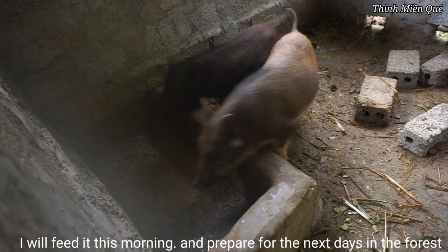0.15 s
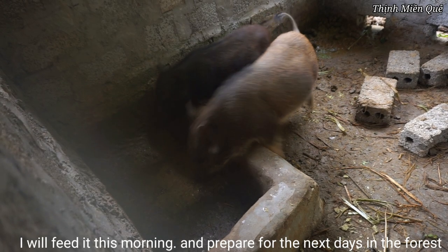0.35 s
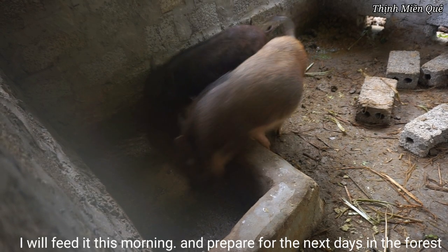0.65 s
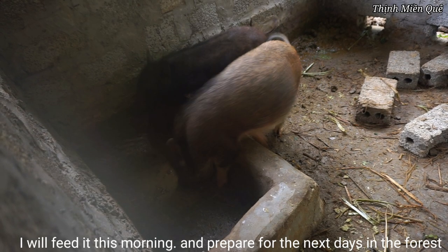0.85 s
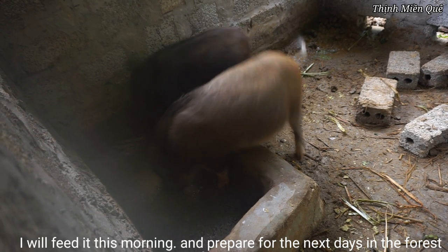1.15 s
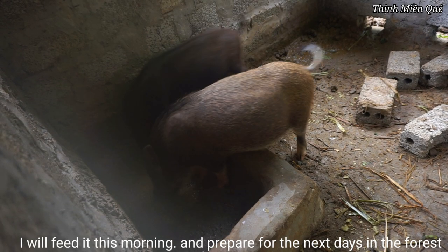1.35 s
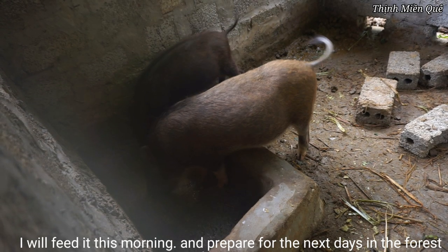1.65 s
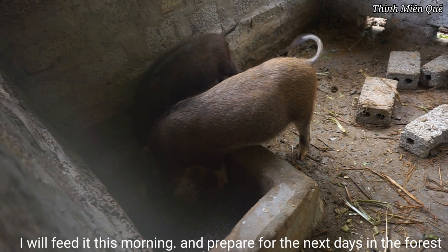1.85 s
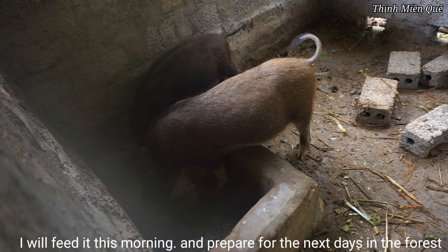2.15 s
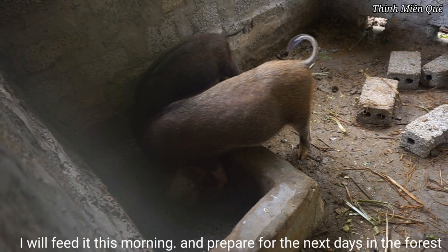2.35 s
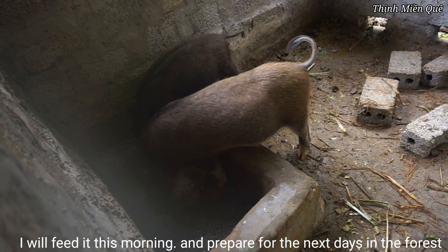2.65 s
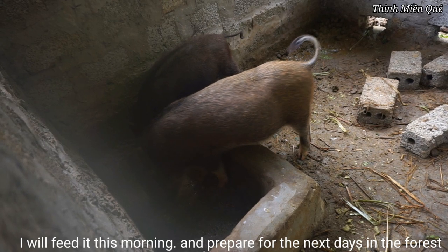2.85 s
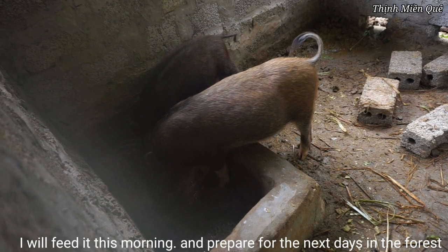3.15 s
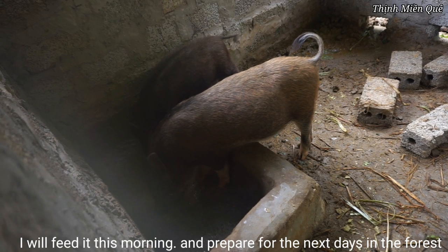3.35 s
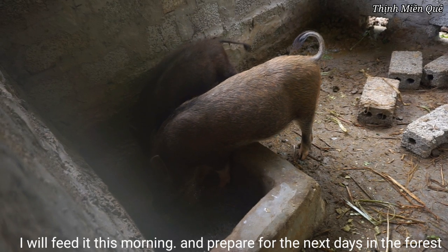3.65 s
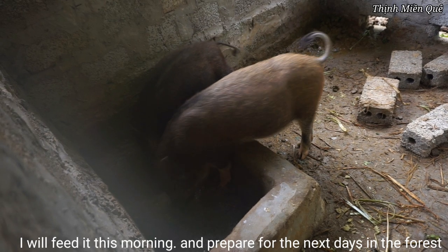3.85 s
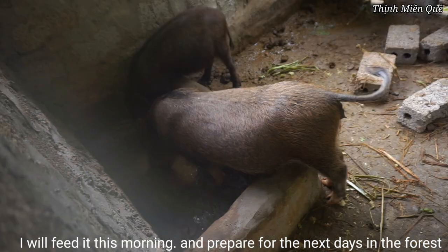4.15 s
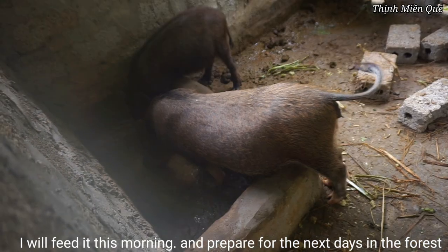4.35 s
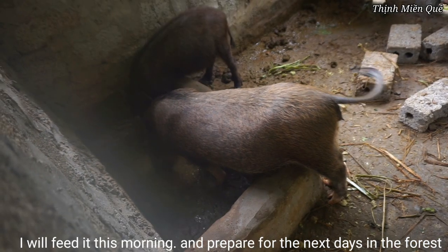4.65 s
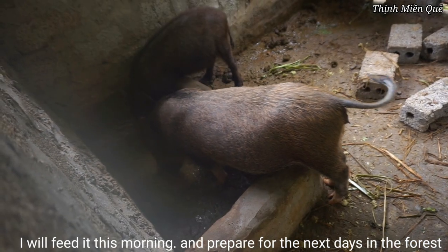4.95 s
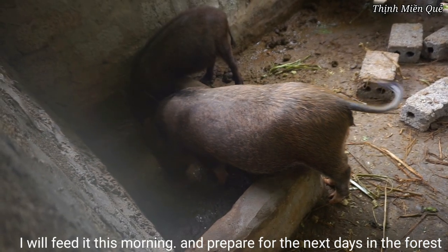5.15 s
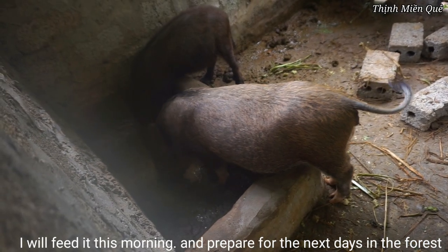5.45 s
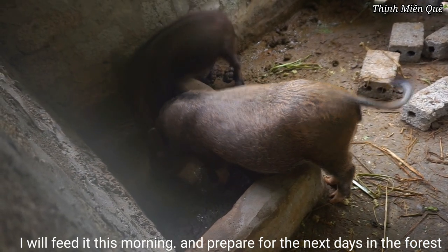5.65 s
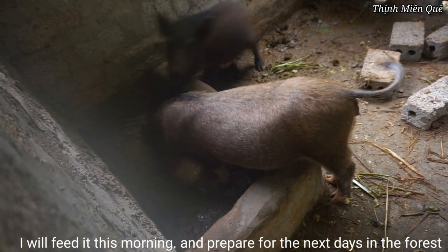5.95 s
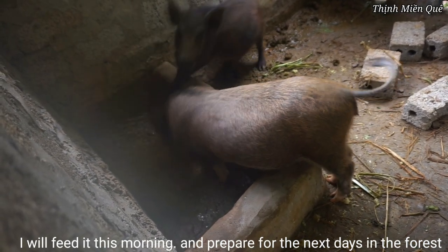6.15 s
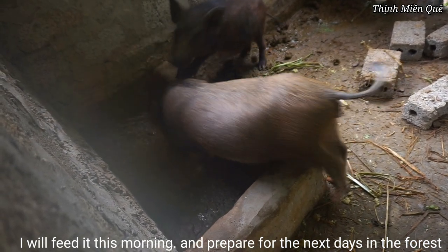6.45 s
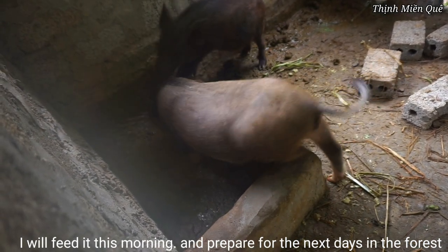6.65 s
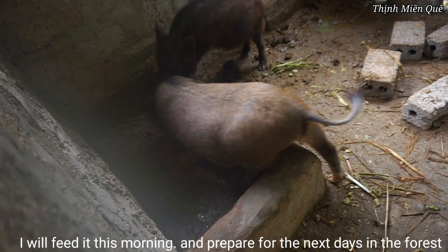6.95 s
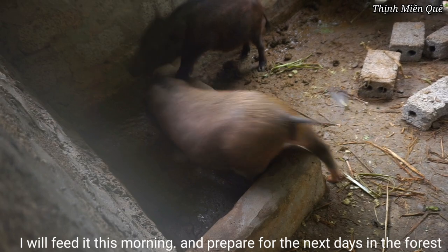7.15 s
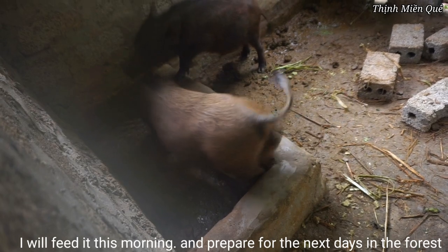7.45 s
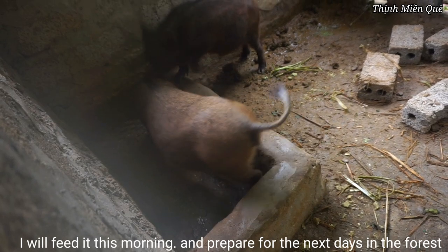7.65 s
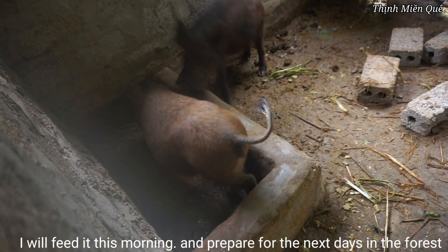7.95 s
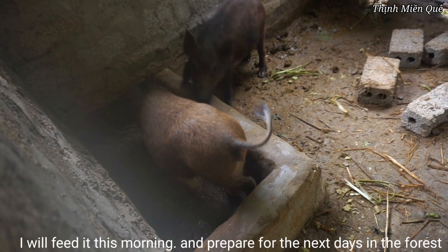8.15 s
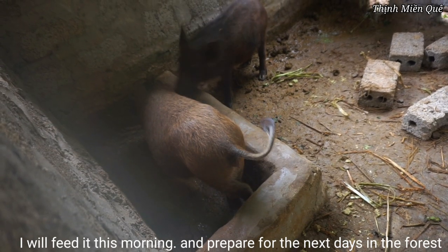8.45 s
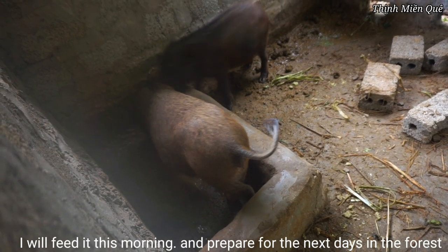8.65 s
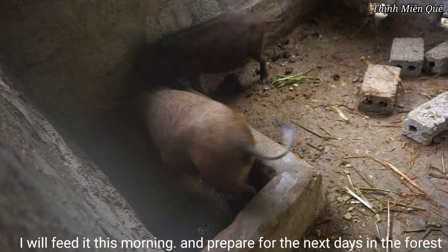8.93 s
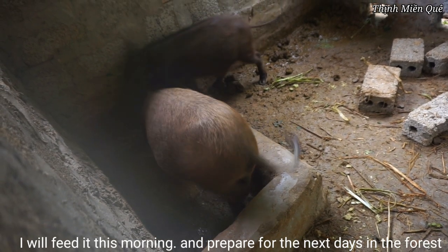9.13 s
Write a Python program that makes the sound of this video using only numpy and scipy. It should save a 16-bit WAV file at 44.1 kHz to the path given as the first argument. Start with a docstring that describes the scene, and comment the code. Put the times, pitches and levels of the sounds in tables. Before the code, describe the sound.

Close stereo sound of two pigs eating wet feed from a concrete trough, brighter and louder on the left, with very short wall echoes over faint open-air hiss and rumble. A soft slurp swells around 0.3 s; from 0.8 s lips smack and tongues plop irregularly, over a fine crackle of bubbles. Sharper wet snaps cluster from 1.4 to 3.5 s, with a drawn-out slurp near 3.4. At 4.2 s everything drops to silence for under a tenth of a second, then quickly returns. A dull trough bump lands at 5.3 s, the sharpest smack at 5.8, then slurps. A far low motor hum swells until 7 s and eases slightly. Hollow plops thicken from 6.4 to 8.2 s; short rising squeaks come at 6.9 and 7.3. Another soft bump falls at 8.1, a brief muffled grunt with tiny squeaks at 8.9, and a last smack, plop and faint thud at 9.1 s.

```python
"""Two pigs slurp wet feed from a concrete trough in a walled pen, two microphone ports close above them.
Open-air noise lies under it all; the first slurp swells at 0.3 s and the lips smack and the tongue plops
from 0.8 s, as bursts of snaps ringing air pockets, over a crackle of tiny bubbles and brief wall echoes.
At 4.2 s the sound drops out for a moment; then a far motor, narrow bands of noise, swells until 7 s.
Dull bumps on the trough come from 5.3 s, short squeaks from 6.9 s and one soft noisy grunt at 8.9 s."""
import sys
import numpy as np
from scipy import signal
from scipy.fft import rfft, irfft
from scipy.io import wavfile
from scipy.ndimage import uniform_filter1d

SR = 44100
rng = np.random.default_rng(int(sys.argv[2]) if len(sys.argv) > 2 else 0)


def unload_wav(signal):
    """Save mono or channel-first audio to the path in sys.argv[1] as 16-bit WAV at rate SR, clipped to [-1, 1]."""
    wavfile.write(
        sys.argv[1],
        SR,
        np.round(np.clip(np.atleast_2d(signal).T, -1, 1) * 32767).astype(np.int16),
    )


N = 409688

# Levels of the pigs' sounds are those at the trough, ahead of the wall echoes and the port differences.
# open-air noise: f/Hz, relative level per Hz/dB
YARD_COLOUR = [(25, -19), (120, 1.5), (420, -3.5), (550, 3.5), (1200, -7), (2400, -8.5), (3100, -14),
               (11000, -17)]
YARD_DB = -54  # overall level
# likeness of the open air at the two ports: f/Hz, left-right correlation/1
YARD_LIKENESS = [(60, 1), (220, 0.25), (840, -0.72), (3100, -0.27), (11000, 0.18)]
# tones of the far motor: f/Hz, width of each filter pass/Hz, level before the swell/dB
HUM_TONES = [(58, 48, -70), (94, 27, -73), (146, 22, -71), (205, 16, -70.5)]
# swell of the far motor: t/s, gain/dB
HUM_SWELL_DB = [(0, -28.5), (4.4, -12), (6.6, 0), (7, 10), (9.29, 5.5)]
# dying away of the pen's echoes: f/Hz, time to fall 60 dB/s
WALL_T60 = [(250, 0.26), (660, 0.1), (1600, 0.12), (2350, 0.12), (3300, 0.1), (9000, 0.12)]
# level difference of the ports: f/Hz, left over right/dB
PORT_LEVEL = [(170, 1), (500, 4.5), (1420, 3.5), (4080, 6.5), (9000, 6)]
# phase difference of the ports: f/Hz, lead of the left/rad (negative lags)
PORT_PHASE = [(100, -0.72), (520, -0.48), (1380, -1.2), (2500, -0.94), (4100, -1.4), (11000, -2.37)]
# a snout or flank bumps the trough: t/s, peak level/dB, f/Hz
TROUGH_BUMPS = [(5.259, -43, 147), (8.121, -45, 163.4), (9.083, -50, 156)]
# soft grunts through the snout: t/s, length/s, peak level/dB, mean pulse rate/Hz,
# f near the middle of the falling glide/Hz
SNOUT_GRUNTS = [(8.888, .065, -40, 140, 430)]
# air sucked through wet lips: t/s, length/s, start f/Hz, end f/Hz, peak level of the pure tone/dB
LIP_SQUEAKS = [(6.909, 0.0555, 2040, 2590, -37.5), (7.341, 0.043, 900, 1350, -45.5),
               (8.865, 0.013, 1910, 1970, -50.5), (8.909, 0.036, 1836, 2140, -55)]
# how busily the snouts work the wet feed between bites: t/s, level/dB
FEED_LEVEL = [(0, -109), (.72, -63), (1.29, -54.5), (1.84, -61), (2.7, -56), (3.47, -59.5), (4.09, -61.5),
              (4.5, -67.5), (5.12, -54.5), (5.59, -63), (5.85, -51.5), (6.2, -65), (6.5, -60), (6.83, -55),
              (7.4, -58.5), (7.85, -58.5), (8.6, -66.5), (9.29, -55.5)]
# drawn-out slurps through the slop: t of the top/s, level added as power/dB, length/s
SLOP_SLURPS = [(0.325, -56.5, 0.15), (1.214, -46, 0.057), (3.423, -43, 0.23), (3.915, -49, 0.028),
               (5.71, -45, 0.17), (6.026, -49, 0.12), (7.517, -52, 0.12), (7.924, -45.5, 0.08),
               (8.715, -50.5, 0.058), (9.29, -50, 0.099)]
# colour of the bubbling feed: bubble f/Hz, relative level per Hz/dB
BUBBLE_COLOUR = [(150, -2.5), (500, -3.5), (1000, -2), (1600, -6.5), (2400, -6.5), (4000, -11),
                 (11000, -14.5)]
# hollow plops of tongue and slop: t of the main push/s, peak level/dB, cavity f at the main push/Hz
TONGUE_PLOPS = [(0.802, -31, 645), (1.4, -26.5, 602), (1.592, -34, 917), (2.172, -32, 622),
                (2.401, -20, 886), (2.51, -31.5, 790), (2.5801, -34, 524), (2.657, -38, 574),
                (2.714, -24, 875), (2.8765, -35.5, 534), (2.9841, -22.5, 853), (3.2197, -24, 1170),
                (3.276, -30, 860), (3.434, -21.5, 1090), (3.496, -23.5, 1450), (3.99, -30, 557),
                (4.051, -30.5, 927), (4.682, -34.5, 600), (4.901, -24, 650), (4.961, -23, 540),
                (5.107, -25, 616), (5.251, -33.5, 674), (5.362, -21.5, 706), (5.806, -22, 623),
                (5.927, -33, 395), (5.9757, -26.5, 1300), (5.997, -30, 795), (6.4402, -26.5, 647),
                (6.608, -23.5, 680), (6.628, -18.5, 920), (6.847, -15.5, 840), (7.02, -37.5, 543),
                (7.0748, -24.5, 650), (7.111, -25.5, 1010), (7.24, -28, 665), (7.345, -29, 810),
                (7.432, -29.5, 575), (7.473, -30, 684), (7.493, -21.5, 710), (7.56, -27, 810),
                (7.632, -30.5, 870), (7.655, -36.5, 696), (7.736, -22, 680), (7.9283, -19.5, 620),
                (7.995, -24.5, 750), (8.105, -36, 544), (8.128, -31.5, 536), (8.187, -24.5, 590),
                (8.2038, -20.5, 843), (8.227, -27, 570), (8.502, -38, 600), (8.6387, -23.5, 720),
                (8.755, -30, 560), (9.093, -25, 827)]
# lips parting: t of the main snap/s, peak level/dB, mouth f at the main snap/Hz,
# spit hiss over that peak/dB, run length ahead of the shortening in bursts()/s
LIP_SMACKS = [(0.804, -36.5, 2410, 12.5, 0.017), (1.0796, -35, 2400, 5.5, 0.0092),
              (1.147, -48, 2480, 13, 0.044), (1.251, -32, 2400, 10, 0.016),
              (1.282, -27.5, 1930, -13, 0.0062), (1.326, -32.5, 2560, -5, 0.007),
              (1.364, -30, 1900, -19.0, 0.004), (1.388, -23.5, 2630, -2.5, 0.008),
              (1.535, -39, 2350, -8, 0.012), (1.584, -18.5, 2410, -11, 0.0075),
              (1.635, -32, 4100, -15, 0.0032), (1.794, -30.5, 2110, -2, 0.014),
              (1.809, -29.5, 3940, -3, 0.015), (1.848, -31.5, 3960, -13, 0.0096),
              (1.9955, -26, 3900, -5.5, 0.0073), (2.11, -24, 2330, -1, 0.012),
              (2.396, -20, 1390, 3, 0.0094), (2.516, -29, 2310, -8.5, 0.02), (2.553, -36.5, 5500, 1, 0.015),
              (2.581, -35.5, 1700, -16, 0.01), (2.709, -23, 1440, -5.5, 0.011),
              (2.764, -31.5, 1480, 2, 0.011), (2.9, -38, 2600, 1, 0.0094), (2.984, -15, 2360, -9.5, 0.0058),
              (3.131, -37, 2550, -13, 0.019), (3.2156, -21.5, 2270, 1, 0.0046),
              (3.238, -29, 2020, -4, 0.0035), (3.276, -34, 2270, 5.5, 0.019),
              (3.386, -22.5, 4060, -5, 0.021), (3.401, -22.5, 2880, -11, 0.0038),
              (3.47, -32.5, 2100, -22, 0.0072), (3.495, -20, 2200, -9, 0.0081),
              (3.619, -30, 2150, -3, 0.017), (3.687, -35.5, 1400, -3, 0.0061),
              (3.993, -27, 2220, 4.5, 0.016), (4.157, -39, 1470, -1, 0.01),
              (4.311, -48.5, 2290, 15.5, 0.036), (4.359, -29, 2070, -8.5, 0.015),
              (4.684, -30.5, 2380, 4, 0.013), (4.852, -35.5, 1250, 3.5, 0.009),
              (4.886, -25, 2090, -10, 0.008), (4.898, -23.5, 1950, -1.5, 0.025),
              (5.105, -29, 3900, 9.5, 0.026), (5.271, -24.5, 2450, -14, 0.011),
              (5.359, -23.5, 1990, 9.5, 0.03), (5.586, -28, 4270, -18, 0.0037),
              (5.601, -35.5, 2190, -1.5, 0.022), (5.803, -8.5, 2340, -10.5, 0.0067),
              (5.935, -33, 2200, 6, 0.029), (5.944, -36, 4500, 2, .01), (5.994, -22.5, 3130, -1, 0.012),
              (6.161, -41, 980, 1, 0.011), (6.216, -32, 3240, -14, 0.0087),
              (6.233, -31.5, 1850, 4.5, 0.012), (6.441, -26, 4000, 4, 0.012), (6.61, -22, 3420, 1, 0.012),
              (6.626, -32.5, 2500, -2, 0.032), (6.708, -33, 2410.0, -5, 0.0084),
              (6.777, -35, 2350, -22, 0.018), (6.8388, -25, 2260, 0.5, 0.012),
              (6.941, -34.5, 2340, 2, 0.0051), (7.072, -15.5, 2570, -7.5, 0.019),
              (7.234, -36.5, 2480, -4.5, 0.022), (7.432, -35, 1990, 5.5, 0.0092),
              (7.479, -28, 4280, -9, 0.0037), (7.483, -22.5, 5040, -16, 0.0067),
              (7.556, -34.5, 4200, -6, 0.01), (7.633, -30.5, 2500, -23, 0.014),
              (7.734, -37.5, 2300, 15, 0.015), (7.933, -23.5, 2430, 1, 0.02),
              (8.204, -27.5, 2450, -2.5, 0.026), (8.632, -28, 3130, 4.5, 0.013),
              (9.093, -24.5, 2240, 2.5, 0.017)]

CUT_S, BACK_S, BACK_FADE_S = 4.2, 4.285, .022  # s: silent from, returning from, length of the return
EDGE_HZ = 11040  # upper band limit
LEAD_S = .03  # s from the start of a burst to its main snap
SLURP_RISE = 0.47  # share of a slurp spent swelling
PLOP_S = 0.013  # s, run length ahead of the shortening in bursts()
NIBBLES_PER_S = 13.0  # mean rate of small chance chews
NIBBLE_OVER_DB = 19.5  # dB over the squelching, ahead of each nibble's own loss of 5.1 to 8.5 dB
NIBBLE_HZ, NIBBLE_OCTAVES = 490, 3.28  # lowest pocket, range above it
NIBBLE_S = .012  # s, longest run ahead of the shortening in bursts()


def gain_of(db):
    """Amplitude factor of a level in dB."""
    return 10 ** (np.asarray(db) / 20)


def evened(x):
    """Scales to an RMS of 1."""
    return x / np.sqrt(np.mean(x ** 2) + 1e-20)


def peaked(x):
    """Scales to a peak of 1."""
    return x / (np.abs(x).max() + 1e-20)


def read(points, hz):
    """Reads a table over frequency, straight lines on a log scale."""
    f, value = np.transpose(points)
    return np.interp(np.log(hz + 1), np.log(f + 1), value)


def curve(points):
    """Draws a table over time as straight lines."""
    s, value = np.transpose(points)
    return np.interp(np.arange(N) / SR, s, value)


def add(mix, s, sound):
    """Lays a sound into the mix from second s."""
    part = mix[:, round(s * SR):][:, :sound.shape[-1]]
    part += sound[..., :part.shape[1]]


def resonate(x, hz, width):
    """A resonance that may glide: shifts hz down to zero, smooths, and shifts back."""
    turn = np.exp(2j * np.pi * np.cumsum(hz * np.ones(len(x))) / SR)
    r = np.exp(-np.pi * width / SR)
    smooth = signal.lfilter([1 - r], [1, -r], x / turn + 1e-18)
    return 2 * (turn * smooth).real


def ring(x, hz, width):
    """A pocket of air: a steep resonance, peak 1."""
    return peaked(resonate(resonate(x, hz, width), hz, 4.5 * width))


def bursts(length_s, per_s, spread_db):
    """A wet film tears in a run of small snaps that swells to one main snap at LEAD_S and dwindles."""
    t = np.arange(4000) / SR - LEAD_S
    hit, size, sign, pocket = rng.random((4, 4000))
    sizes = gain_of(spread_db * np.log(size + 1e-9))
    train = (hit < per_s / SR) * sizes * np.sign(sign - .5)
    train[round(LEAD_S * SR)] = 1.61  # the main snap
    reach = max(abs(length_s) - .003, 1e-3) * np.where(t < 0, .33, .8)
    begun = t > -2.2 * reach  # the film gives way suddenly
    return t, train * begun * np.exp(-abs(t) / reach), pocket


def yard():
    """Open-air hiss and rumble: shaped noise with patches that drift in time and pitch."""
    frames, hz = N // 256 + 5, np.fft.rfftfreq(1024, 1 / SR)
    a, b, c, d, patches = rng.standard_normal((frames, 513, 5)).T
    patches = evened(uniform_filter1d(uniform_filter1d(patches, 12, 0), 14, 1))
    same = np.clip(read(YARD_LIKENESS, hz), -1, 1)[:, None]
    left = a + 1j * b
    right = same * left + np.sqrt(1 - same ** 2) * (c + 1j * d)
    tilt = 0.22 * read(PORT_LEVEL, hz)[:, None] * [[[1]], [[-1]]]  # left up, right down
    z = np.array([left, right])
    z *= gain_of(read(YARD_COLOUR, hz)[:, None] + 3.86 * patches + tilt)
    air = signal.istft(z, nperseg=1024, noverlap=768)[1][:, :N]
    return gain_of(YARD_DB) * evened(air)


def hum():
    """Fuzzy low tones of a far motor: noise passed twice through narrow resonances."""
    air = rng.standard_normal(N)
    tones = np.zeros(N)
    for hz, width, db in HUM_TONES:
        tones += gain_of(db) * evened(resonate(resonate(air, hz, width), hz, width))
    return tones * gain_of(curve(HUM_SWELL_DB))


def walls(x):
    """Sparse echoes of random sign; three sets fade steadily into one another, so the tail keeps shifting."""
    size, out = SR // 3, np.zeros((2, N))
    for k in range(3):
        taps = np.zeros((2, size))
        at = np.arange(130, size - 20, 20)
        places = at + rng.integers(0, 20, (2, len(at)))
        np.put_along_axis(taps, places, rng.choice([-1., 1.], (2, len(at))), 1)
        # mainly the bass of an echo is alike at both ports
        taps[1] += 0.72 * np.convolve(taps[0], np.hanning(12) / 3.06, "same")
        hz, t, z = signal.stft(taps, SR, nperseg=128)
        decay = gain_of(-60 * t / read(WALL_T60, hz)[:, None])
        tail = signal.istft(z * decay, SR, nperseg=128)[1]
        tail = tail / np.linalg.norm(tail[0])
        # 1.3 cycles per second, a third of a cycle between sets
        turn = np.sqrt(2 / 3) * np.cos(2 * np.pi * (1.3 * np.arange(N) / SR + k / 3))
        out += signal.fftconvolve((x * turn)[None], tail, axes=1)[:, :N]
    return out


def ports(x):
    """The left port faces the pigs: louder, mostly in the treble, and lagging the right in phase."""
    hz = np.fft.rfftfreq(N, 1 / SR)
    half = gain_of(read(PORT_LEVEL, hz) / 2) * np.exp(.5j * read(PORT_PHASE, hz))
    return irfft(rfft(x) * np.array([half, 1 / half]), N)


def bump(db, hz):
    """A dull soft thud of the concrete: a low sine that swells and dies within hundredths of a second."""
    t = np.arange(4000) / SR
    return gain_of(db) * peaked(t * np.exp(-t / 0.01) * np.sin(2 * np.pi * hz * t))


def grunt(length_s, db, per_s, hz):
    """Uneven soft pulses ring a snout that sinks in pitch."""
    u = np.linspace(0, 1, round(length_s * SR))
    wobble = evened(uniform_filter1d(rng.standard_normal(len(u)), 300))
    turns = np.cumsum(per_s * (1 + 0.17 * wobble)) / SR
    pulses = np.diff(turns // 1, prepend=0) * np.sin(np.pi * u)
    snout = ring(pulses, hz * (1.15 - 0.34 * u), 180)
    return gain_of(db) * peaked(resonate(snout, hz, hz))


def squeak(length_s, start_hz, end_hz, db):
    """A short rising whistle, a gliding sine made breathy and unsteady by noise around its pitch."""
    hz = np.linspace(start_hz, end_hz, round(length_s * SR))
    breath = evened(resonate(rng.standard_normal(len(hz)), hz, 0.076 * hz.mean()))
    whistle = np.sin(2 * np.pi * np.cumsum(hz) / SR)
    return gain_of(db) * np.hanning(len(hz)) * (whistle + 0.5 * breath)


def busy():
    """Level of the working mouths: the slow course plus each slurp's swell and fade, summed as power."""
    t, power = np.arange(N) / SR, gain_of(2 * curve(FEED_LEVEL))
    for s, db, length_s in SLOP_SLURPS:
        reach = length_s * np.where(t < s, SLURP_RISE, 1 - SLURP_RISE)
        power = power + gain_of(2 * db) * np.exp(-(2 * (t - s) / reach) ** 2)
    return np.sqrt(power)


def squelch():
    """Tiny bubbles burst in the feed, each a few rising cycles; large, middle and small clump apart."""
    clumps = uniform_filter1d(uniform_filter1d(rng.standard_normal((4, N)), 350), 350)
    clumps = evened(clumps[1:] + 0.97 * clumps[0])  # a shared part and one of each size's own
    size = gain_of(3.0 * np.minimum(rng.exponential(1, N), 5))
    size = size * (rng.random(N) < 4500 / SR)  # 4500 bubbles per second
    pitches, out = np.geomspace(330, 10500, num=27), np.zeros(N)
    kind = rng.integers(0, len(pitches), N)
    for k, hz in enumerate(pitches):
        turns = np.arange(0, 14, hz / SR)
        fade = np.exp(-turns / 4.7) * np.minimum(turns, 1)
        bubble = np.sin(2 * np.pi * turns * (1 + 0.0077 * turns)) * fade
        pops = size * (kind == k) * gain_of(3.5 * clumps[k // 9])
        out += gain_of(read(BUBBLE_COLOUR, hz)) * hz * signal.oaconvolve(pops, bubble)[:N]
    return evened(out)


def nibbles(level):
    """Small single pockets of air pop at chance moments, louder where the mouths are busy."""
    out = np.zeros((2, N))
    gap, size, pitch, length = rng.random((250, 4)).T
    for k, s in enumerate(np.cumsum((.2 + 1.6 * gap) / NIBBLES_PER_S)):
        if s < N / SR:
            t, pushes, _ = bursts(NIBBLE_S * length[k], per_s=1100, spread_db=7.0)
            hz = NIBBLE_HZ * 2 ** (NIBBLE_OCTAVES * pitch[k])
            pop = ring(pushes, hz * (1 + 1.6 * t), 0.13 * hz)
            add(out, s, gain_of(3.4 * (size[k] - 2.5)) * pop)
    return out * level * gain_of(NIBBLE_OVER_DB)


def plop(db, hz, length_s):
    """Soft pushes ring an air pocket whose pitch rises as it opens, and a smaller one beside it."""
    t, pushes, _ = bursts(length_s, per_s=250, spread_db=4.5)
    pocket = hz * (1 + 1.0 * t)
    tone = ring(pushes, pocket, 0.35 * hz)
    tone = tone + 0.33 * ring(pushes, rng.uniform(1.3, 1.893) * pocket, 0.15 * hz)
    tone = tone + 0.098 * ring(pushes, .5 * pocket, 0.2 * hz)  # the slop heaves underneath
    return gain_of(db) * peaked(resonate(tone, hz, 1.2 * hz))


def smack(db, hz, hiss_db, length_s):
    """Snaps ring the front of the mouth and stray bubbles of other sizes; fine spit hisses on top."""
    t, snaps, pocket = bursts(length_s, per_s=700, spread_db=1.5)
    stray = hz * 2 ** rng.uniform(-0.67, 1.336, 4)
    tone = ring(snaps, hz * (1 + .6 * t), 0.14 * hz)
    for k, f in enumerate(stray):
        own = snaps * (pocket * 4 // 1 == k)  # each snap falls to one stray bubble
        tone = tone + 0.45 * ring(own, f, 0.16 * f)
    fizz = rng.standard_normal((2, len(t)))
    fizz[1] = 0.089 * fizz[0] + 0.46 * fizz[1]  # spit sprays from all along the lips
    spray = signal.lfilter([1], [1, -.98], signal.lfilter([1], [1, -.96], abs(snaps)))
    spit = []
    for side in np.diff(fizz, prepend=0):
        hiss = side * spray
        spit.append(resonate(hiss, 2400, 5500) + 0.98 * resonate(hiss, 1.8 * stray[0], 900))
    return gain_of(db) * peaked(tone) + gain_of(db + hiss_db) * peaked(np.array(spit))


def scene():
    """Both pigs at the trough, the pen around them and the background."""
    level = busy()
    pigs = level * squelch() + nibbles(level)
    for s, *row in TROUGH_BUMPS:
        add(pigs, s, bump(*row))
    for s, *row in SNOUT_GRUNTS:
        add(pigs, s, grunt(*row))
    for s, *row in LIP_SQUEAKS:
        add(pigs, s, squeak(*row))
    for s, db, hz in TONGUE_PLOPS:
        add(pigs, s - LEAD_S, plop(db, hz, PLOP_S))
    for s, *row in LIP_SMACKS:
        add(pigs, s - LEAD_S, smack(*row))
    echoes = gain_of(-2.5) * walls(pigs[0])
    return yard() + hum() + ports(pigs + echoes)


def record(dry):
    """The sound drops out within 2 ms and fades back in; a steep low-pass limits the band."""
    t = np.arange(N) / SR
    before = np.clip((CUT_S - t) / .002, 0, 1)
    after = np.clip((t - BACK_S) / BACK_FADE_S, 0, 1)
    low_pass = signal.firwin(1501, EDGE_HZ, window=("kaiser", 9), fs=SR)
    return signal.oaconvolve(dry * (before + after), low_pass[None], "same")


dry = scene()
out = record(dry)
unload_wav(out)
```